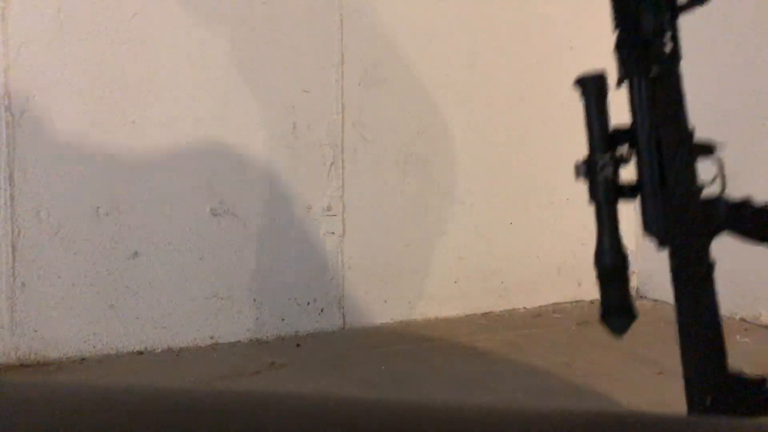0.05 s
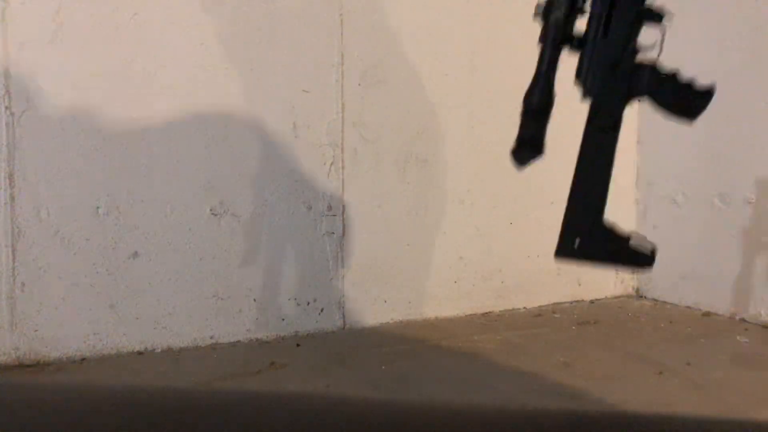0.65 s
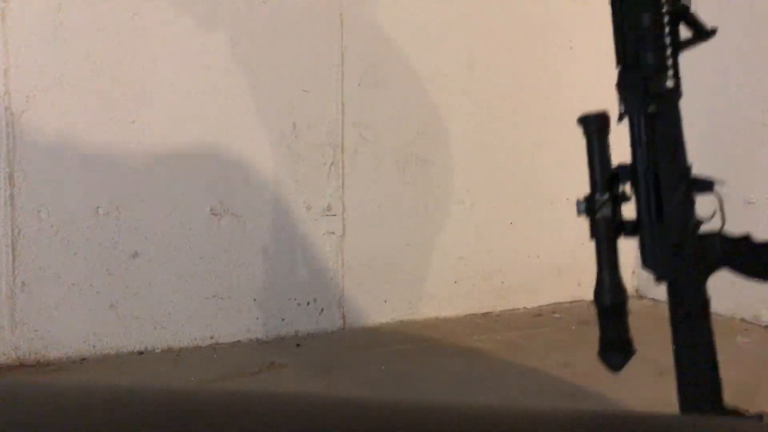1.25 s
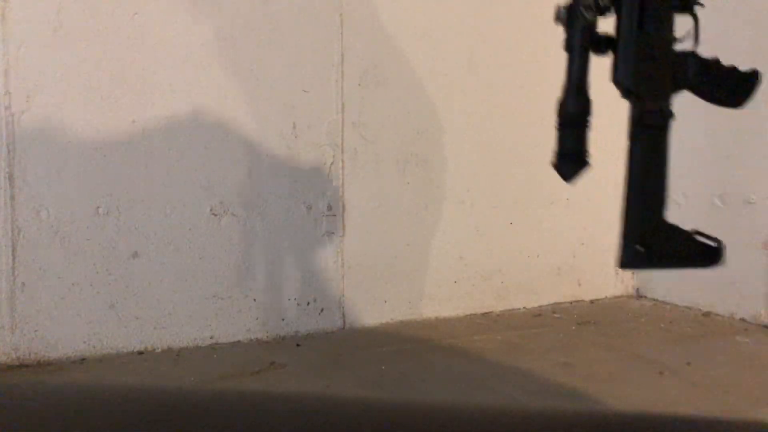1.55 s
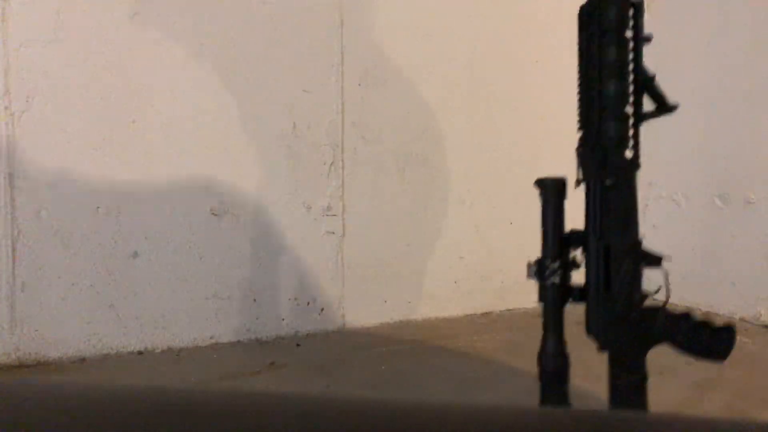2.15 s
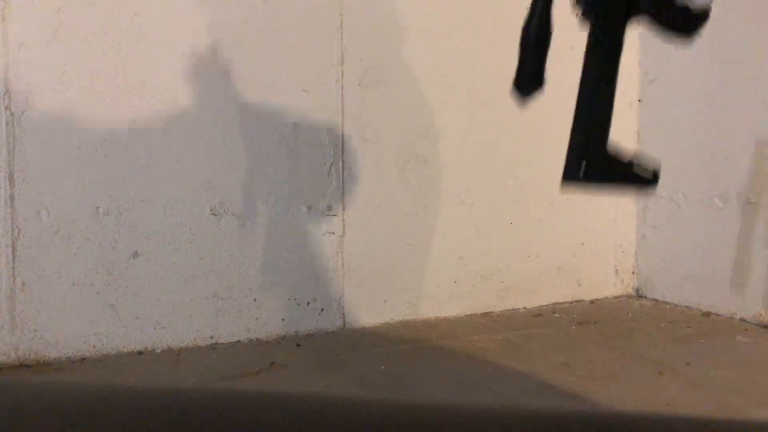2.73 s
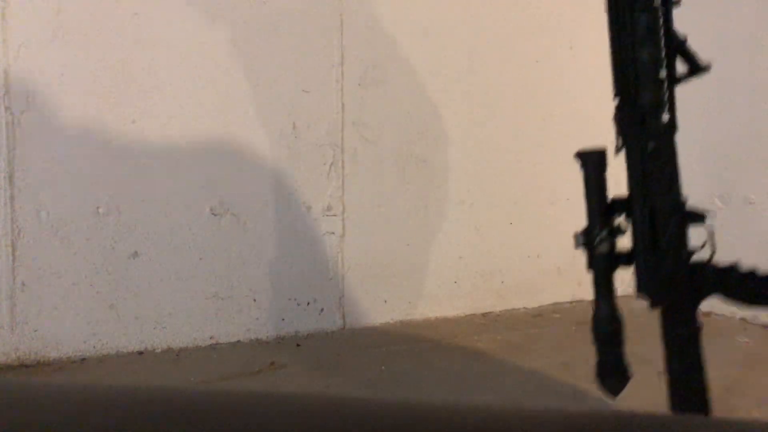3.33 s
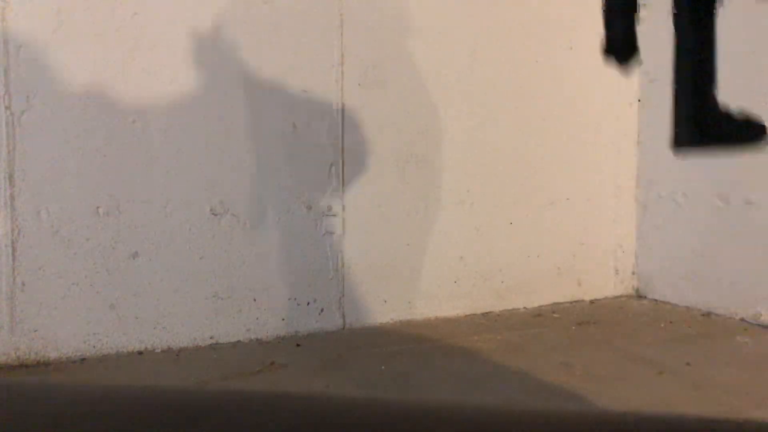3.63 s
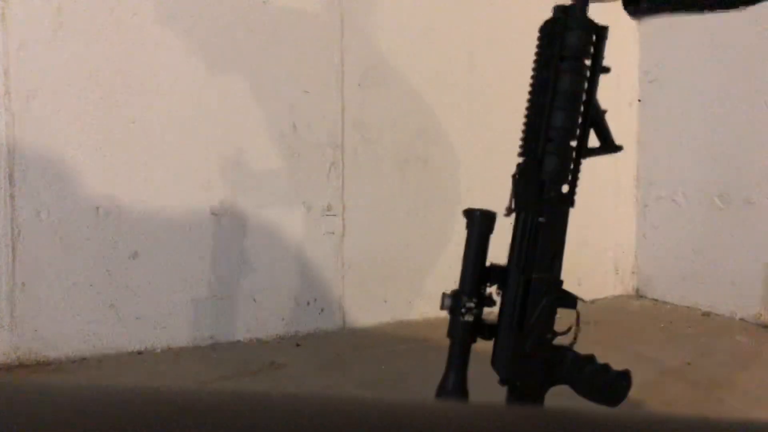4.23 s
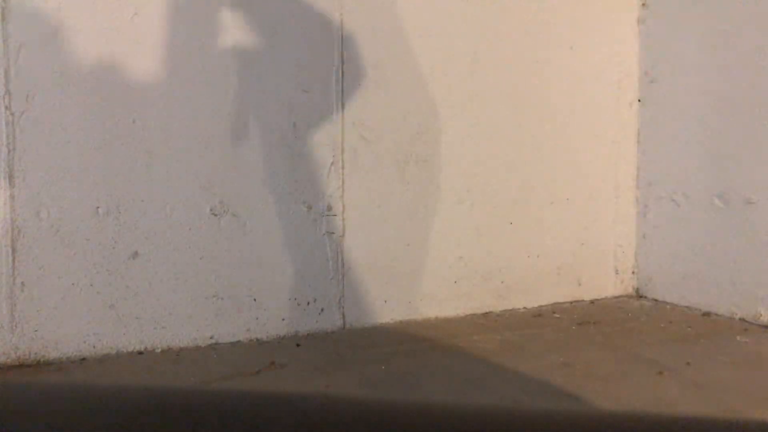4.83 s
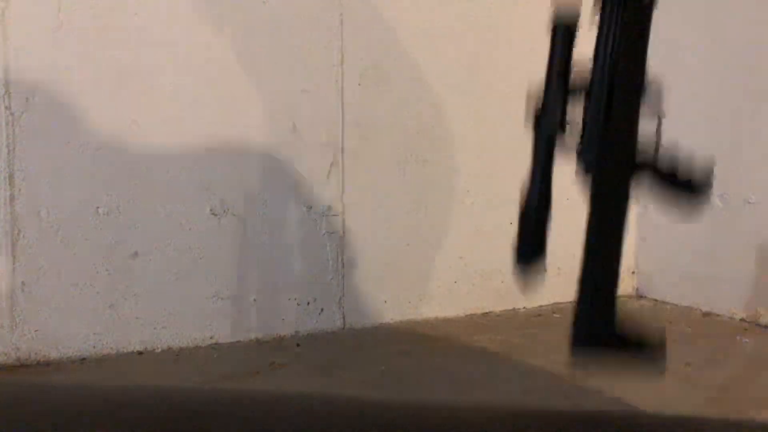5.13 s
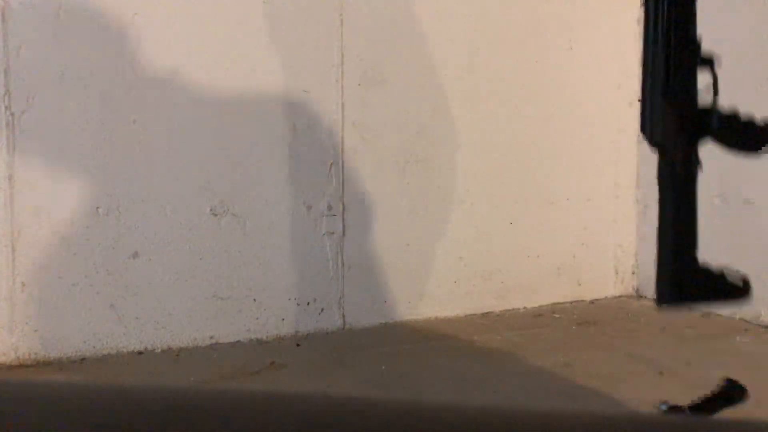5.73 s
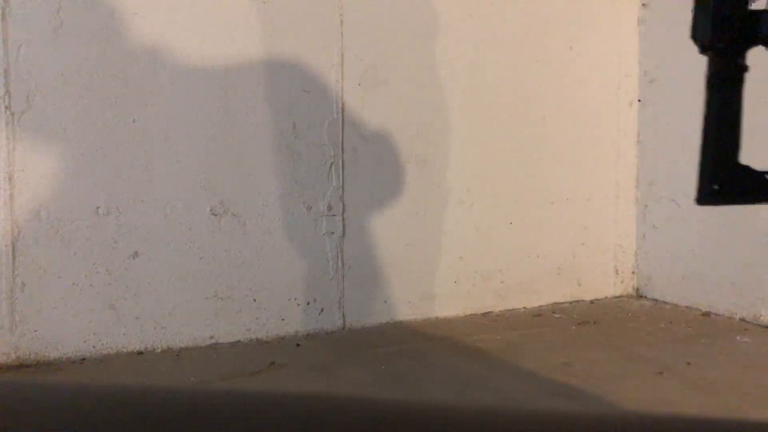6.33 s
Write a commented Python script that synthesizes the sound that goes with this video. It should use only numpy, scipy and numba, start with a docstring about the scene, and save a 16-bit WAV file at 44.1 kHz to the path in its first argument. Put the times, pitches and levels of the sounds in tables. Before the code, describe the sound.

The sound opens on the fading ring of a blow just struck in a small, bare concrete room, heard near the floor. A rifle then lands butt first on the concrete five times, at about 0.9, 1.9, 3.0, 4.2 and 5.3 seconds, the last two slightly harder. Each blow is a low thud with a sharp crack, followed at once by a rattle of loose parts and a bright clack, echoing off the walls for under a second. Between blows come faint handling clicks, a tiny high metal ping near 1.5 seconds and a soft hollow knock from the grip near 4.9. The scope comes off and hits the floor at about 5.7 and 6.0 seconds with two quieter, hollow knocks and small bounces, then rolls faintly for a moment. A very quiet low drone lies underneath throughout.

```python
"""A small concrete room rings from a blow just struck, over a low drone.
A rifle is dropped butt first on the floor five more times. Each blow thuds and cracks,
loose parts rattle and clack back, and the bare walls echo and ring on.
Between blows: handling clicks, a faint metal ping, a hollow knock from the grip.
After the last blow the scope comes off, knocks on the floor twice with small bounces and rolls a little."""
import sys
import numpy as np
from scipy import signal
from scipy.fft import rfft, irfft
from scipy.io import wavfile
from scipy.ndimage import uniform_filter1d
from numba import njit

SR = 44100
rng = np.random.default_rng(int(sys.argv[2]) if len(sys.argv) > 2 else 0)


def dump_mix(stems):
    """Bounce the given channels to the path in sys.argv[1] as a 16-bit WAV at rate SR."""
    frames = np.atleast_2d(stems).T  # one column per channel
    limited = np.clip(frames, -1, 1)  # hard clip at full scale
    pcm = np.round(limited * 32767).astype(np.int16)
    wavfile.write(sys.argv[1], SR, pcm)


N = 281358
LEAD = SR // 2  # samples before time zero, for the opening blow
TOTAL = N + LEAD

# reverberation decay: (frequency [Hz], T60 [s])
REVERB_T60 = [(60, 1), (250, 1), (500, 0.72), (1200, 0.76), (3000, 0.7), (5400, 0.51), (7700, 0.41),
              (11000, 0.33), (16000, 0.16)]
# floor, wall and ceiling echoes: (delay [s], level [dB])
NEAR_ECHOES = [(.005, -7.5), (0.014, -0.5), (0.0198, 0), (0.029, -6), (0.0395, 4.5), (0.0423, 5.5),
               (.053, -8.5)]
# long waves off the far walls: (delay [s], level [dB])
FAR_ECHOES = [(0.0707, -13), (0.125, -13.5)]
# room modes: (frequency [Hz], level [dB], T60 [s])
STANDING_WAVES = [(75, -14.5, 2.3), (130.7, -11.5, 4.1), (188.3, -5.5, 1.8), (277, -6, 1.1),
                  (374, -16, 0.46)]
# low drone: (frequency [Hz], level [dB])
DRONE_SPECTRUM = [(20, -35), (45, -17.5), (75, 3), (100, 0.5), (133, 2.5), (165, -8.5), (280, -3),
                  (450, -21), (1000, -26.5), (4000, -35), (9000, -41.5), (16000, -42)]
# drone envelope: (time [s], level [dB])
DRONE_LEVELS = [(.9, -66.5), (1.6, -59)]
# butt landings: (time [s], strength [dB], looseness of fittings [dB], fall-back delay [s])
BUTT_BLOWS = [(-.235, -5.5, 9, .065), (0.9359, 0, .5, 0.05), (1.9479, 2, -2, 0.06),
              (3.0283, 1.5, 1.5, 0.064), (4.1654, 4.5, -0.15, .0638), (5.3193, 5, 1.14, 0.065)]
# barrel, rail and receiver: (frequency [Hz], width [Hz], level over the crack [dB])
RIFLE_MODES = [(1150, 60, -3), (1184, 12, -2), (1555, 24, -9.5), (1695, 76, -5.5), (2260, 100, -6.5),
               (3170, 90, -6), (3600, 27, -11.5), (4000, 45, -14), (5820, 53, -13.5), (7430, 270, -10.5),
               (7900, 88, -8.5)]
# broad crack: (frequency [Hz], level [dB])
CRACK_SPECTRUM = [(100, -25), (300, -8.5), (600, -9.5), (1000, -2.5), (2000, -2), (3000, 1.5), (4500, -1.5),
                  (8000, 0), (9700, -4), (12500, -1.5), (15800, -8.5), (18000, -41)]
# butt thud: (frequency [Hz], level [dB])
THUD_SPECTRUM = [(25, -28), (60, -5.5), (90, -1.5), (128, 6.5), (200, 3), (280, 1), (450, -10.5),
                 (900, -18.5), (4000, -67.5)]
# dull knock of loose parts and scope: (frequency [Hz], level [dB])
KNOCK_SPECTRUM = [(60, -20), (140, 0), (300, 5.5), (750, -6), (1050, -6.5), (1450, -2.5), (2000, -9.5),
                  (5000, -20), (16000, -52.5)]
# metal ping: (frequency [Hz], width [Hz], level [dB])
PING_MODES = [(6961, 6.5, -2), (7978, 7.5, -2)]
# handling and settling: (time [s], level [dB], centre [Hz], spread [octaves])
HANDLING_CLICKS = [(1.747, -57, 2193, 1.4), (1.85, -53.5, 12000, .9), (3.769, -46.5, 2296, 1.27),
                   (4.084, -43.5, 13300, .15), (5.196, -49, 13000, 0.14), (5.2411, -31, 3160, .94),
                   (6.146, -27, 900, 0.23)]
# hollow grip: (frequency [Hz], width [Hz], level [dB])
GRIP_MODES = [(700, 87, 0.5), (1203, 260, 0.5), (3300, 470, -8), (7300, 2000, -23)]
# scope on the floor: (time [s], strength [dB], bright part [dB], tube ring [dB])
SCOPE_LANDINGS = [(5.679, -16, -4, -4.5), (5.686, -17.5, 5, -1), (5.7181, -28.5, -1, -26),
                  (5.958, -14, -9, -0.5), (6.057, -24, -12, -27), (6.101, -27.5, -15, -6)]
# scope tube: (frequency [Hz], width [Hz], level [dB])
TUBE_MODES = [(278.3, 72, -7), (487, 190, 0), (750, 180, 2), (1423, 64, 6), (1560, 65, -7),
              (2870, 490, -9.5)]
# rolling rumble: (frequency [Hz], level [dB])
ROLL_SPECTRUM = [(50, -22.5), (130, -7.5), (300, -8), (600, -0.5), (900, -21), (1150, -12.5), (1600, -34),
                 (2500, -20), (14000, -56)]


def undb(db):
    """Decibels to gain."""
    return 10 ** (np.asarray(db) / 20)


def unit(x):
    """Scale to unit energy."""
    return x / np.sqrt(np.sum(x ** 2))


def seconds(count):
    """Time axis of count samples."""
    return np.arange(count) / SR


def lookup(points, hz):
    """Interpolate (Hz, value) points over log frequency."""
    f, value = np.transpose(points)
    return np.interp(np.log(np.maximum(hz, 1)), np.log(f), value)


def through(x, response):
    """Convolve, keeping the length of x."""
    return signal.fftconvolve(x, response)[:len(x)]


def colour(points, size=8192):
    """Minimum-phase, unit-energy response shaped by (Hz, dB) points."""
    gain = undb(lookup(points, np.fft.rfftfreq(size, 1 / SR)))
    cepstrum = irfft(np.log(gain))
    cepstrum[1:size // 2] *= 2
    cepstrum[size // 2 + 1:] = 0
    return unit(irfft(np.exp(rfft(cepstrum))))


def resonances(modes):
    """Impulse response of damped modes."""
    t = seconds(SR // 4)
    return sum(undb(db) * 2 * np.pi * width_hz / SR
               * np.exp(-np.pi * width_hz * t) * np.cos(2 * np.pi * hz * t)
               for hz, width_hz, db in modes)


def add(track, time_s, x):
    """Mix x into the track at time_s."""
    i = LEAD + int(time_s * SR)
    track[i:i + len(x)] += x[:len(track) - i]


def flat_burst(envelope):
    """Enveloped noise with the near-flat spectrum of a sharp impact."""
    x = rng.standard_normal(len(envelope)) * envelope
    for _ in range(4):
        white = irfft(np.exp(1j * np.angle(rfft(x))), len(x))
        local_rms = np.sqrt(np.abs(uniform_filter1d(white ** 2, 128)) + 1e-12)
        x = white * envelope / local_rms
    return unit(x)


def contact(length_s):
    """Hard contact: a dying burst of tiny collisions."""
    t = seconds(SR // 15)
    return flat_burst(np.exp(-(t / length_s) ** 1.3 / 2))


def reverberation(build_s, size):
    """Diffuse sound builds between bare walls; treble dies first."""
    t, f = seconds(size), np.fft.rfftfreq(size, 1 / SR)
    spectrum = rfft(rng.standard_normal(size))
    centres_hz = np.geomspace(50, 16000, 18)
    tail = 0
    for hz, weights in zip(centres_hz, np.eye(len(centres_hz))):
        band = irfft(spectrum * lookup(np.c_[centres_hz, weights], f), size)
        tail += band * np.exp(-np.log(1000) * t / lookup(REVERB_T60, hz))
    return unit(tail * (1 - np.exp(-t / build_s)))


def treble_room(direct_db, echo_db, tail_db, scatter_s):
    """Short waves: direct sound, echoes scattered by corners, reverberation."""
    response = undb(tail_db) * reverberation(build_s=0.011, size=SR)
    response[0] += undb(direct_db)
    for delay_s, db in NEAR_ECHOES:
        echo, i = contact(scatter_s), int(delay_s * SR)
        response[i:i + len(echo)] += undb(db + echo_db) * echo
    return response


def bass_room(tail_db, modes_db):
    """Long waves echo, reverberate and excite standing waves."""
    response = undb(tail_db) * reverberation(build_s=0.021, size=3 * SR // 2)
    t = seconds(len(response))
    for hz, db, t60_s in STANDING_WAVES:
        response += undb(db + modes_db) * np.cos(2 * np.pi * hz * t) * np.exp(-np.log(1000) * t / t60_s)
    response[0] += 1
    for delay_s, db in FAR_ECHOES:
        response[int(delay_s * SR)] += undb(db)
    return response


def walls(x, spots=4, dwell_s=0.037):
    """Clatter moves from spot to spot on the rifle; each has its own room response."""
    active_spot = (seconds(TOTAL) // dwell_s) % spots
    sound = np.zeros(TOTAL)
    for spot in range(spots):
        share = uniform_filter1d(1.0 * (active_spot == spot), 128)
        room = treble_room(direct_db=4.5, echo_db=-12.5, tail_db=1.5, scatter_s=0.0049)
        sound += through(x * share, room)
    return sound


def drone():
    """Low noise; rises early, then holds."""
    level_db = np.interp(seconds(TOTAL) - LEAD / SR, *np.transpose(DRONE_LEVELS))
    return undb(level_db) * through(rng.standard_normal(TOTAL), colour(DRONE_SPECTRUM))


def swish(length_s):
    """Rustle of the downswing."""
    envelope = np.hanning(int(length_s * SR))
    return unit(rng.standard_normal(len(envelope)) * envelope)


def rifle_body():
    """Broad crack plus the ring of barrel, rail and receiver."""
    response = resonances(RIFLE_MODES)
    response[0] += 1
    return unit(through(response, colour(CRACK_SPECTRUM)))


def cracks(swish_lead_s=0.11, swish_db=-51):
    """The rifle swings down; the butt hits concrete and excites the body."""
    force = np.zeros(TOTAL)
    for time_s, db, *_ in BUTT_BLOWS:
        add(force, time_s - swish_lead_s, undb(db + swish_db) * swish(length_s=0.13))
        add(force, time_s, undb(db) * contact(length_s=0.0093))
    return through(force, rifle_body())


def thuds(lag_s=0.0037):
    """The rifle's weight lands in one push, repeated by the near walls."""
    force = np.zeros(TOTAL)
    for time_s, db, *_ in BUTT_BLOWS:
        for delay_s, echo_db in [(0, 0), *NEAR_ECHOES]:
            add(force, time_s + lag_s + delay_s, undb([db + echo_db]))
    return through(force, colour(THUD_SPECTRUM))


def rattle(peak_s, grain_db):
    """Chatter of fittings: swells, then stops as they seat."""
    t = seconds(SR // 6)
    grains = np.repeat(rng.standard_normal(len(t)), 64)[:len(t)]
    swell = (t / peak_s) * np.exp(-(t / peak_s) ** 4 / 4)
    return flat_burst(undb(grain_db * grains) * swell)


def loose_parts(rattle_db=-2.5, knock_db=-20, gap_s=0.0068, contact_s=0.0028):
    """Parts rattle, then fall back: a bright double clack over a dull knock."""
    bright, dull = np.zeros((2, TOTAL))
    for time_s, db, loose_db, fall_s in BUTT_BLOWS:
        add(bright, time_s, undb(db + loose_db + rattle_db) * rattle(peak_s=0.047, grain_db=6.5))
        for delay_s, clack_db in (fall_s, -2.5), (fall_s + gap_s, -1):
            add(bright, time_s + delay_s, undb(db + loose_db + clack_db) * contact(contact_s))
            add(dull, time_s + delay_s, undb(db + knock_db) * contact(contact_s))
    return through(bright, rifle_body()) + through(dull, colour(KNOCK_SPECTRUM))


def ping(time_s, gain_db):
    """Metal rings faintly as the rifle is lifted."""
    track = np.zeros(TOTAL)
    add(track, time_s, undb(gain_db) * unit(resonances(PING_MODES)))
    return track


def clicks():
    """Light handling and settling contacts, each in its own band."""
    track, f = np.zeros(TOTAL), np.geomspace(30, 20000, 80)
    for time_s, db, centre_hz, spread_oct in HANDLING_CLICKS:
        band_db = -20 * np.log10(1 + (np.log2(f / centre_hz) / spread_oct) ** 4)
        add(track, time_s, undb(db) * through(contact(length_s=0.0055), colour(np.c_[f, band_db])))
    return track


def grip_knock(time_s, gain_db):
    """Hollow knock as the grip shifts."""
    track = np.zeros(TOTAL)
    add(track, time_s, undb(gain_db) * through(contact(length_s=0.0059), unit(resonances(GRIP_MODES))))
    return track


def falling_scope(contact_s=0.00298):
    """The scope hits the floor: dull knock, bright clatter, tube ring."""
    dull, bright, tube = np.zeros((3, TOTAL))
    for time_s, db, bright_db, ring_db in SCOPE_LANDINGS:
        for track, part_db in (dull, 0), (bright, bright_db), (tube, ring_db):
            add(track, time_s, undb(db + part_db) * contact(contact_s))
    return (through(dull, colour(KNOCK_SPECTRUM)) + through(bright, rifle_body())
            + through(tube, unit(resonances(TUBE_MODES))))


def rolling_scope(start_s, gain_db, rise_s=0.057, hold_s=0.11, fade_db_per_s=249.5, grain_db=9):
    """The rim bumps over the concrete's grain: speeds up, rolls on, runs out."""
    t = seconds(TOTAL) - LEAD / SR - start_s
    slowing_s = np.maximum(t - rise_s - hold_s, 0)
    envelope = np.clip(t / rise_s, 0, 1) * undb(gain_db - fade_db_per_s * slowing_s)
    hits = rng.random(TOTAL) < 1 / 64
    bumps = hits * rng.standard_normal(TOTAL) * undb(grain_db * rng.standard_normal(TOTAL))
    return through(bumps / bumps.std() * envelope, colour(ROLL_SPECTRUM))


def scene():
    """Clatter, thuds and drone in the room, heard near the floor."""
    handling = ping(time_s=1.45, gain_db=-53) + clicks() + grip_knock(time_s=4.869, gain_db=-35)
    clatter = undb(8.5) * (cracks() + loose_parts() + handling + falling_scope())
    sound = walls(clatter + rolling_scope(start_s=6.0, gain_db=-48.5))
    sound += through(thuds(), bass_room(tail_db=-14, modes_db=-65.5))
    return (sound + drone())[None, LEAD:]


@njit
def follow(x, attack, release):
    """Level follower with per-sample rise and fall coefficients."""
    levels, level = np.empty(len(x)), 0.0
    for i in range(len(x)):
        level += (abs(x[i]) - level) * (attack if abs(x[i]) > level else release)
        levels[i] = level
    return levels


def limit(x, threshold_db, attack_s, release_s):
    """Cut the gain while the level exceeds the threshold."""
    level = follow(x, 1 / (attack_s * SR), 1 / (release_s * SR))
    return x / np.maximum(1, level / undb(threshold_db))


def record(dry):
    """Limiter, soft clip, steep low-pass."""
    ceiling, cutoff_hz = 0.8, 16000
    limited = limit(dry[0], threshold_db=-12.5, attack_s=0.0045, release_s=0.014)
    clipped = ceiling * np.tanh(limited / ceiling)
    lowpass = signal.ellip(12, 0.2, 90, cutoff_hz, fs=SR, output="sos")
    return signal.sosfilt(lowpass, clipped)[None]


dry = scene()
out = record(dry)
dump_mix(out)
```